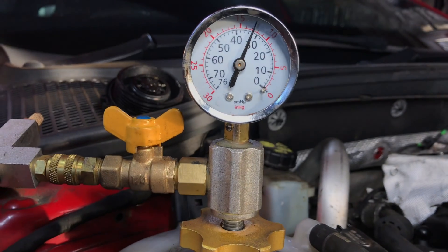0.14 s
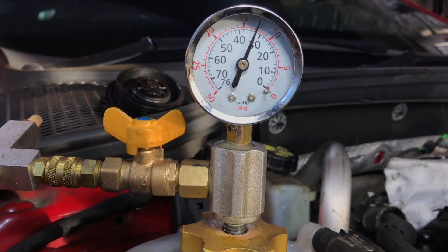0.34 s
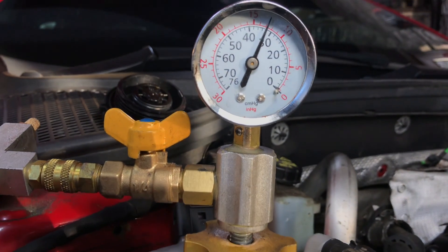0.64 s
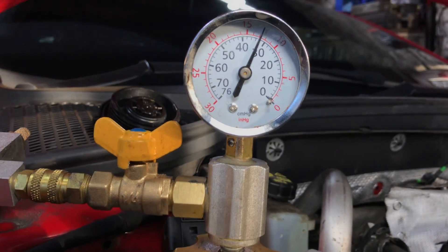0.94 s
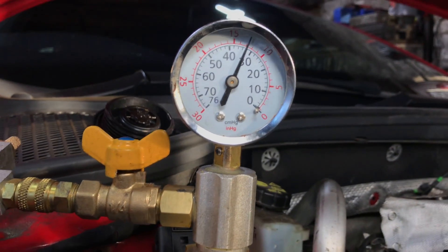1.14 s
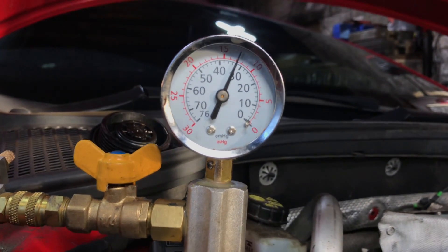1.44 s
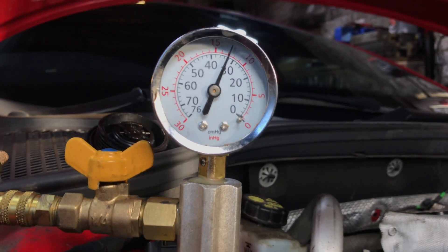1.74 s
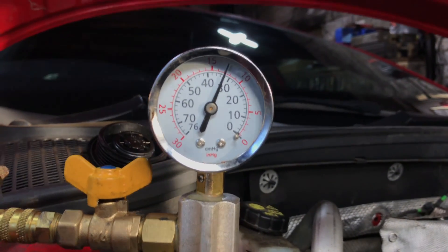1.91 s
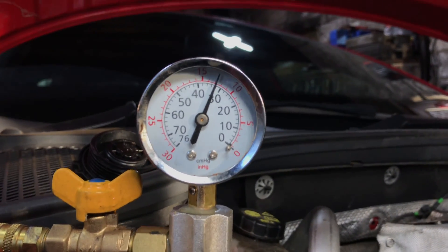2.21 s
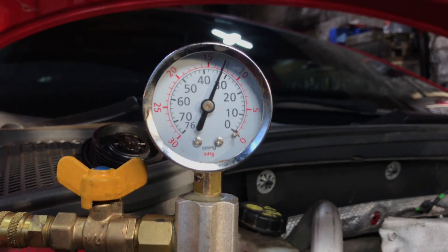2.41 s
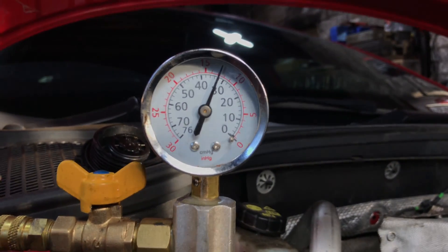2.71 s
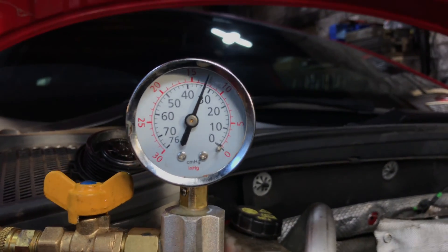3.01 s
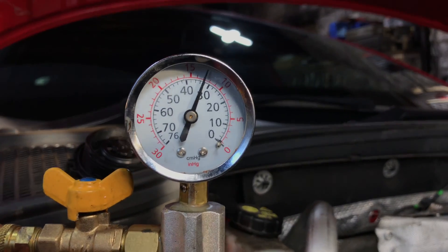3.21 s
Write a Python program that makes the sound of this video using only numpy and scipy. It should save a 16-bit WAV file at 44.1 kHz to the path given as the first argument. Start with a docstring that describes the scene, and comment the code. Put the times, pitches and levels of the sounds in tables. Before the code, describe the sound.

A loud, even, sharp air hiss fills the whole stretch, recorded close in an engine bay with short reflections. Its tone changes slightly as the microphone moves up; faint workshop hum and two dull handling-like bumps lie underneath.

```python
"""The loudest sound throughout is the steady rush of compressed air through a venturi vacuum tool on a
car's cooling system: turbulent noise coloured by the tool's bore and by short engine-bay reflections.
The colour shifts as the hand-held microphone is raised. Two soft bumps are decaying bands of noise.
Behind them lies a workshop drone of wavering sines blurred by narrow noise, over a dull rumble."""
import sys
import numpy as np
from scipy import signal
from scipy.fft import irfft
from scipy.io import wavfile
from scipy.ndimage import uniform_filter1d, map_coordinates

SR = 44100
rng = np.random.default_rng(int(sys.argv[2]) if len(sys.argv) > 2 else 0)


def transcribe(signal):
    """Save signal, clipped to [-1, 1], as a 16-bit WAV file at the path in sys.argv[1]."""
    frames = np.atleast_2d(signal).T
    limited = np.clip(frames, -1, 1)
    pcm = np.round(limited * 32767).astype(np.int16)
    wavfile.write(sys.argv[1], SR, pcm)


N = 147735

# Microphone height: t/s, height/1 (0 beside the tool, 1 above it)
MICROPHONE_HEIGHT = [(0, 0), (.45, .1), (.85, 0.38), (1.3, 0.63), (2.1, 0.84), (2.6, 0.84), (3.35, 1)]
# Rms level of the hiss in three bands: t/s, body level/dB, middle level/dB, treble level/dB
HISS_LEVELS = [(0, -40.5, -21.5, -19.5), (.9, -39.5, -20.5, -20), (1.35, -40, -20.5, -19.5),
               (1.75, -39.8, -20.5, -19.5), (2.15, -40, -20.5, -19), (2.65, -38.5, -20, -19.5),
               (3.35, -39, -20.5, -19.5)]
# Broad relative shape of the hiss within each band: f/Hz, spectral level/dB
HISS_SHAPE = [(300, -28.5), (400, -35), (600, -20.5), (1000, -21), (2400, -13), (2850, -3.5), (3300, -6),
              (4000, -14), (5200, -15.5), (5700, -4.5), (7200, -5.5), (9100, 0), (9450, -6.5), (10400, -14),
              (11000, 0), (13000, -4.5), (14500, -3.5), (15700, -5)]
# Peaks and notches of the tool and engine bay:
# f/Hz, half width/Hz (to 1/e of the dB gain), level beside the tool/dB, level above it/dB
TOOL_AND_BAY_RESONANCES = [(1150, 97, -11.0, -9.5), (1620, 75, -6.5, -9.5), (1710, 133, -4.5, 2.0),
                           (2240, 106, 0.0, -7.5), (2570, 158, -5.5, -6.0), (3220, 123, 6.0, 3.0),
                           (3710, 178, -4.5, 6.0), (4280, 208, 11.0, 5.5), (4660, 82, 4.5, 7.5),
                           (4850, 45, -2.0, -3.5), (5020, 86, -2.0, 9.0), (5520, 98, 7.0, -0.5),
                           (6150, 163, 6.0, -5.5), (6420, 98, -6.5, -9.5), (6730, 45, -5.0, -5.5),
                           (7220, 104, 1.5, 8.0), (7560, 97, 6.5, -0.5), (7960, 210, -6.0, -9.0),
                           (8280, 90, -9.5, 0.0), (8490, 66, 5.0, 1.5), (9400, 169, -12.0, -6.0),
                           (10140, 85, -3.0, 5.0), (10480, 60, -4.5, -6.0), (10670, 93, -5.5, 1.5),
                           (10900, 54, -1.5, 4.5), (11140, 193, -6.5, -10.5), (11520, 244, 2.0, -9.0),
                           (12150, 400, -8.0, 2.5), (12300, 102, -2.5, -6.0), (12790, 173, 1.0, -6.5),
                           (13480, 81, 3.0, -4.5), (13890, 186, 4.0, 3.0), (15010, 131, 1.5, 4.5),
                           (15520, 80, 0.5, -8.5)]
# Soft bumps: t/s, f/Hz of the ring, level/dB of the ring before its envelope
SOFT_BUMPS = [(1.895, 126, -41), (2.465, 200, -44.5)]
# Lines of the workshop drone: f/Hz (mean), level/dB before the swell
DRONE_LINES = [(52, -48.5), (73, -42), (109.5, -54)]
# Rise and fall of the whole drone: t/s, level/dB
DRONE_SWELL_CURVE = [(0, -5), (.27, -1), (.35, 2), (.5, 2.5), (.66, -2), (.77, 4), (1.02, -3.5), (1.35, 2),
                     (1.8, 0), (2.0, -10), (2.13, -10), (2.22, 2.5), (2.45, -6.5), (2.6, 3.5), (2.85, -4),
                     (3.05, -3), (3.35, 1.5)]
# Relative shape of the dull rumble: f/Hz, spectral level/dB
RUMBLE_SHAPE = [(15, -36), (30, -10), (45, 9), (70, 11), (92, -10), (140, -2.5), (200, -0.5), (250, -16),
                (310, -9), (400, -22), (800, -29)]

BODY_EDGE_HZ, TREBLE_EDGE_HZ = 2400, 10000
PATCH_DB, PATCH_HZ, PATCH_S = 0.5, 610, 0.016  # rms depth and extent of the turbulent patches
ECHO_SHARE = 0.29  # root-sum-square gain of all reflections
ECHO_NEAR_S, ECHO_FAR_S = 0.002, 0.012
SWAY_S, SWAY_RATE_HZ = 0.00004, 0.38  # rms drift of each delay, and its corner frequency
BUMP_RISE_S, BUMP_T60_S, BUMP_WIDTH_HZ = 0.021, 0.45, 18
THUD_DB, THUD_HZ, THUD_WIDTH_HZ = -8.5, 160, 150  # level relative to the ring
WAVER_HZ, WAVER_DB, WAVER_RATE_HZ = 2.64, 1.5, 7.6  # rms pitch and level waver, corner frequency
DRONE_ROUGH, DRONE_WIDTH_HZ = 0.35, 10.7  # noise amplitude relative to each line, half width
RUMBLE_DB = -51
CUTOFF_HZ = 15730


def amp(db):
    """Logarithmic level: 20 dB is a factor of ten in amplitude."""
    return 10 ** (np.asarray(db) / 20)


def unit(x):
    """Normalisation: the mean square is brought to one."""
    return x / np.sqrt(np.mean(x ** 2) + 1e-20)


def spectrum(points, hz):
    """Spectral envelope: levels are interpolated along a logarithmic frequency axis."""
    f, db = np.transpose(points)
    return np.interp(np.log(hz + 1), np.log(f + 1), db)


def noise(gain):
    """Random-phase synthesis: a prescribed magnitude spectrum gives stationary noise of rms 1."""
    hz = np.fft.rfftfreq(N, 1 / SR)
    phases = np.exp(2j * np.pi * rng.random(len(hz)))
    return unit(irfft(gain(hz) * phases, N))


def band(centre_hz, width_hz):
    """Resonant noise: amplitude halves at one width from the centre."""
    return noise(lambda hz: 1 / (1 + ((hz - centre_hz) / width_hz) ** 2))


def wander(rate_hz):
    """Slow random modulation: low-pass noise of rms 1 without a constant part."""
    return noise(lambda hz: (hz > 0) / (1 + (hz / rate_hz) ** 2))


def turbulence():
    """Turbulent jet noise: white noise fluctuates in small patches of time and frequency."""
    white = rng.standard_normal(N)
    _, _, z = signal.stft(white, nperseg=256, noverlap=192)
    patches = rng.standard_normal(z.shape[::-1]).T
    patches = uniform_filter1d(patches, max(1, round(PATCH_HZ * 256 / SR)), 0)
    patches = uniform_filter1d(patches, max(1, round(PATCH_S * SR / 64)), 1)
    shaken = z * amp(PATCH_DB * unit(patches))
    return signal.istft(shaken, nperseg=256, noverlap=192)[1][:N]


def engine_bay(x, count=14):
    """Comb interference: reflections drift in path as the microphone sways, so the fine comb moves."""
    out, sample = x.copy(), np.arange(N)
    gain = ECHO_SHARE / np.sqrt(count)
    for delay_s in rng.uniform(ECHO_NEAR_S, ECHO_FAR_S, count):
        path = (delay_s + SWAY_S * wander(SWAY_RATE_HZ)) * SR
        out += gain * map_coordinates(x, [sample - path], order=3, mode="wrap")
    return out


def venturi():
    """Filtered jet noise: tool and bay resonances colour the hiss according to microphone height."""
    jet = engine_bay(turbulence())
    hz, t, z = signal.stft(jet, SR, nperseg=2048, noverlap=1536)
    height = np.interp(t, *np.transpose(MICROPHONE_HEIGHT))
    colour_db = spectrum(HISS_SHAPE, hz)[:, None]
    for centre, width, beside, above in TOOL_AND_BAY_RESONANCES:
        bell = np.exp(-((hz - centre) / width) ** 2)
        colour_db = colour_db + np.outer(bell, beside + (above - beside) * height)
    colour_db = colour_db - 60 * (hz[:, None] < 200)  # keep the hiss out of the lowest range
    z = z * amp(colour_db)

    # Body, middle and treble each follow their own level.
    part = np.digitize(hz, [BODY_EDGE_HZ, TREBLE_EDGE_HZ])[:, None]
    times, *levels = np.transpose(HISS_LEVELS)
    hiss = np.zeros(N)
    for k, db in enumerate(levels):
        sound = signal.istft(z * (part == k), nperseg=2048, noverlap=1536)[1][:N]
        hiss += unit(sound) * amp(np.interp(np.arange(N) / SR, times, db))
    return hiss


def bumps():
    """Damped vibration: a narrow ring in a broader thud rises briefly, then decays exponentially."""
    out = np.zeros(N)
    for start, hz, db in SOFT_BUMPS:
        age = np.maximum(np.arange(N) / SR - start, 0)
        rise = np.minimum(age / BUMP_RISE_S, 1)
        decay_db = -60 * np.maximum(age - BUMP_RISE_S, 0) / BUMP_T60_S
        ring = band(hz, BUMP_WIDTH_HZ)
        thud = amp(THUD_DB) * band(THUD_HZ, THUD_WIDTH_HZ)
        out += rise * amp(db + decay_db) * (ring + thud)
    return out


def workshop():
    """Random modulation: sines wavering in pitch and level, with noise around them, over rumble."""
    drone = np.zeros(N)
    for hz, db in DRONE_LINES:
        pitch_hz = hz + WAVER_HZ * wander(WAVER_RATE_HZ)
        turns = np.cumsum(pitch_hz) / SR + rng.random()
        line = unit(np.sin(2 * np.pi * turns) * amp(WAVER_DB * wander(WAVER_RATE_HZ)))
        drone += amp(db) * unit(line + DRONE_ROUGH * band(hz, DRONE_WIDTH_HZ))
    swell = amp(np.interp(np.arange(N) / SR, *np.transpose(DRONE_SWELL_CURVE)))
    rumble = amp(RUMBLE_DB) * noise(lambda hz: amp(spectrum(RUMBLE_SHAPE, hz)))
    return drone * swell + rumble


def scene():
    """Superposition: the pressures of all sources add, alike in both channels."""
    return np.tile(venturi() + bumps() + workshop(), (2, 1))


def record(dry):
    """Band limitation: a steep linear-phase low-pass removes the highest frequencies."""
    lowpass = signal.firwin(1023, CUTOFF_HZ, window=("kaiser", 10), fs=SR)
    return signal.oaconvolve(dry, lowpass[None], "same")


dry = scene()
out = record(dry)
transcribe(out)
```